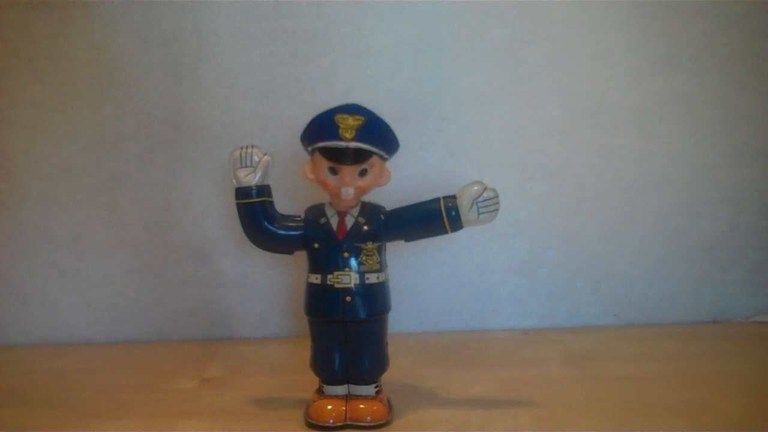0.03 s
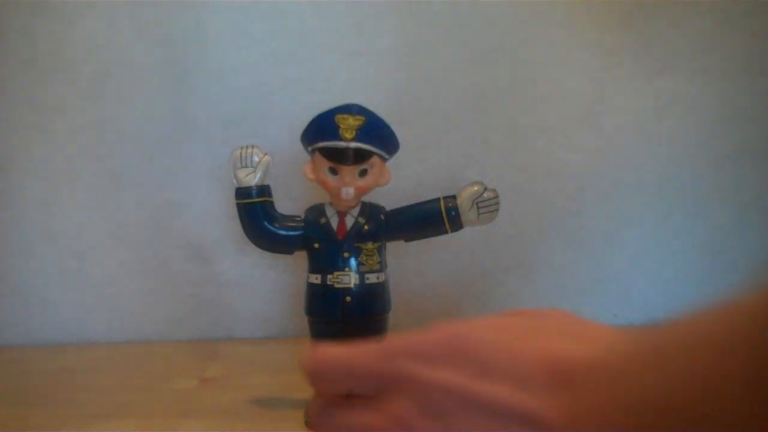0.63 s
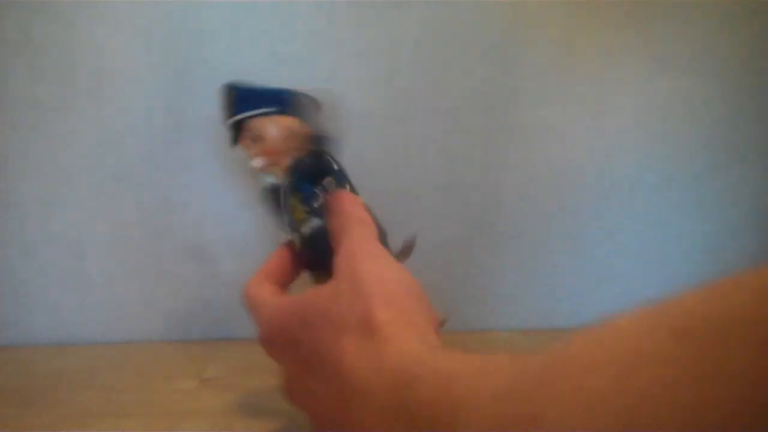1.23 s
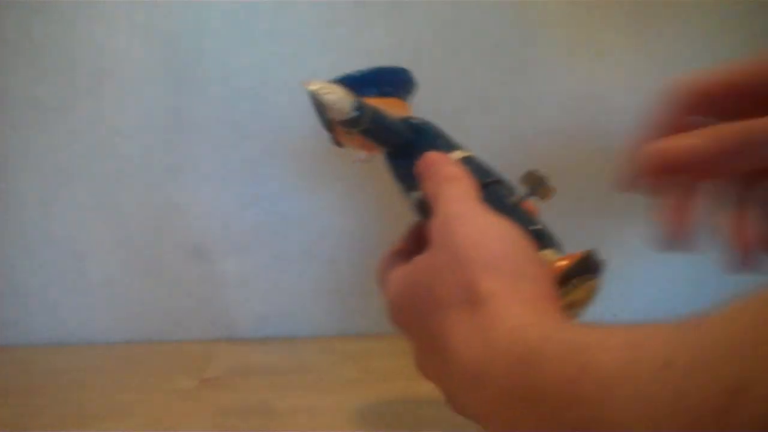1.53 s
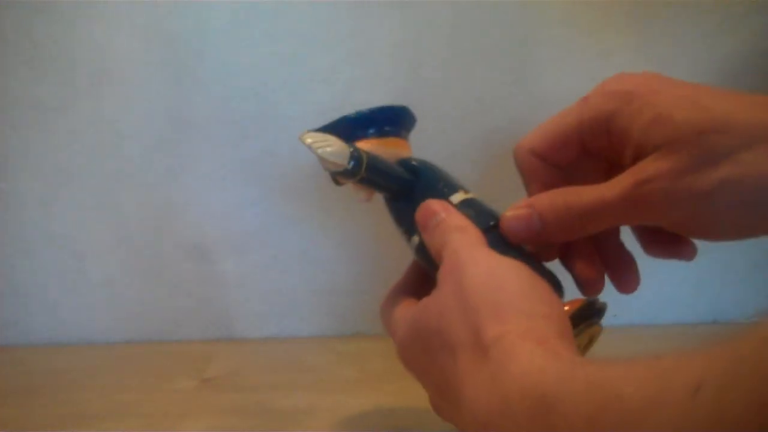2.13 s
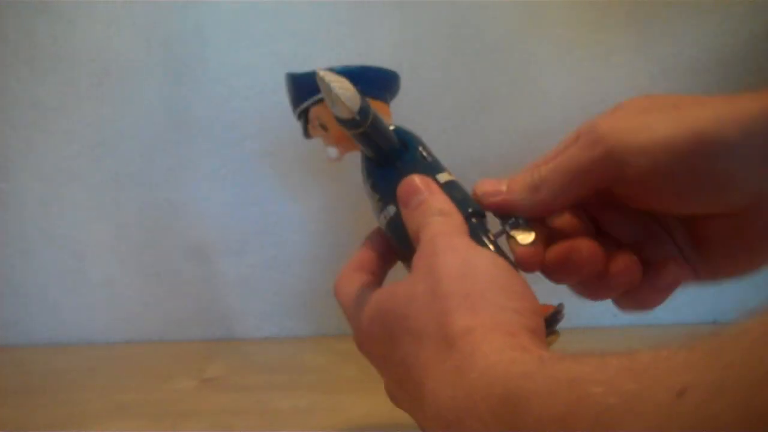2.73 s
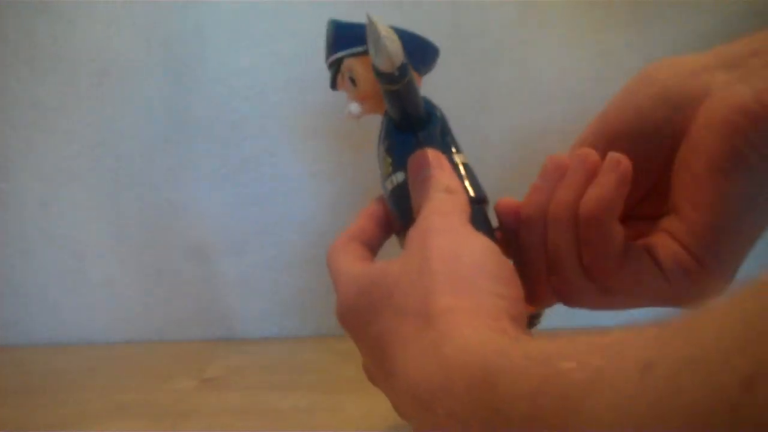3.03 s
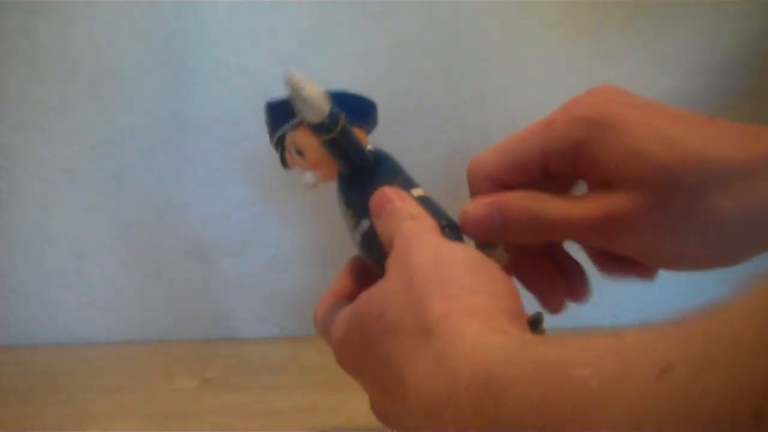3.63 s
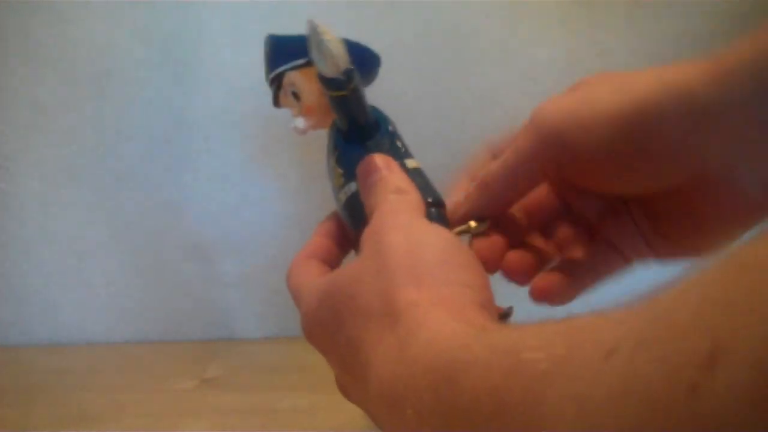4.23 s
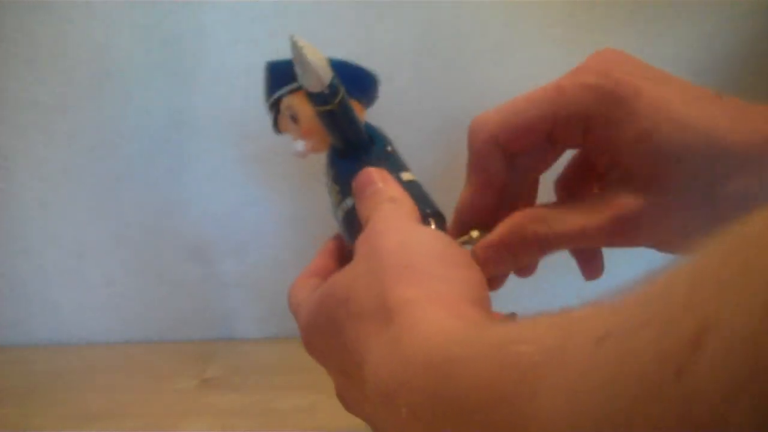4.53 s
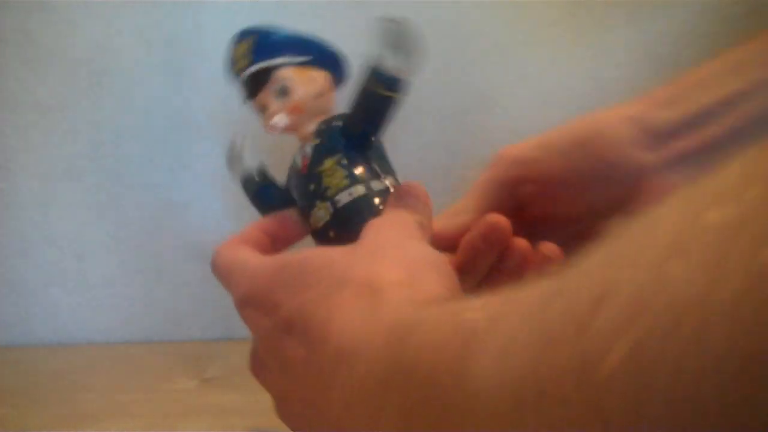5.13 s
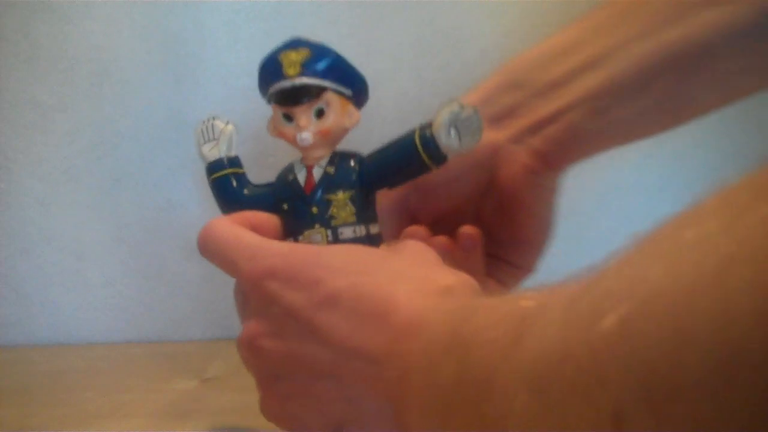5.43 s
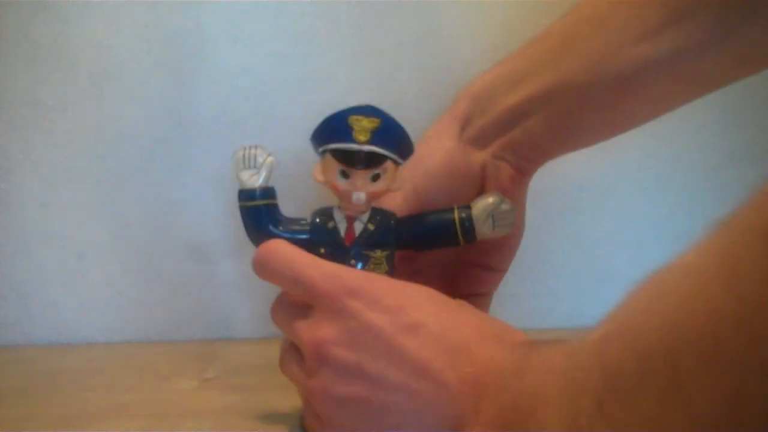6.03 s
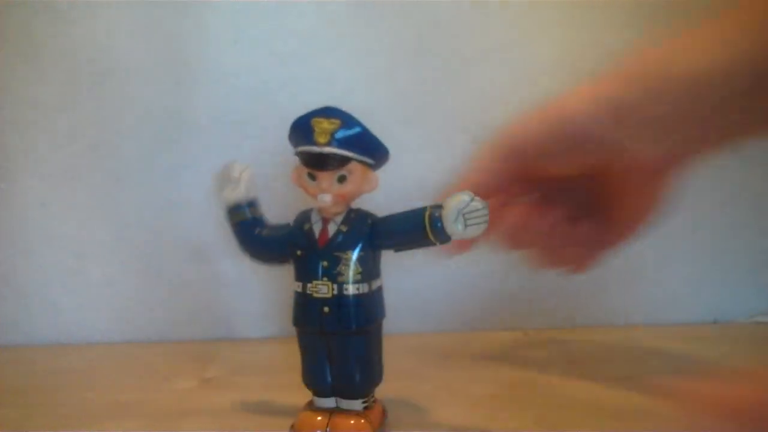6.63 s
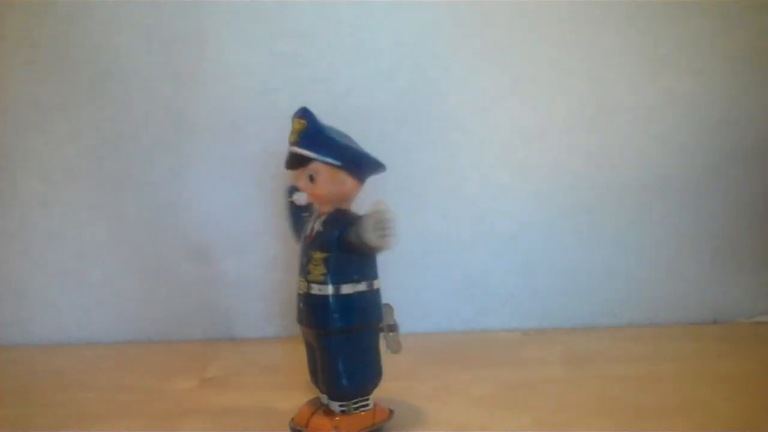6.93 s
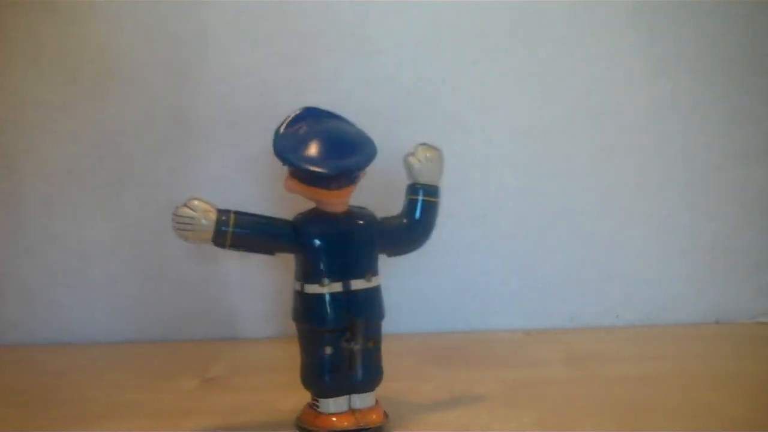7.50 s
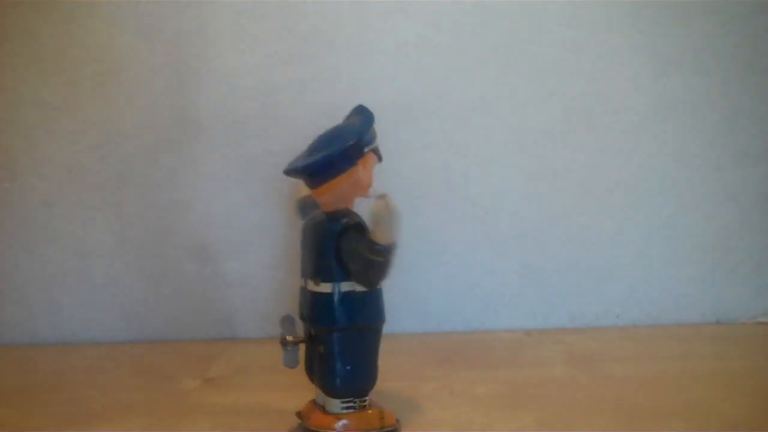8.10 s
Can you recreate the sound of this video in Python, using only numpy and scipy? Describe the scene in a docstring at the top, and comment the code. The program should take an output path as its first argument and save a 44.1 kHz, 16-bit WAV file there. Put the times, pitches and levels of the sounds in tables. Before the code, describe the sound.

Close by in a small quiet room, hands lift a tin clockwork figure with a faint hiss and light metallic taps. Winding follows: crisp snaps of the ratchet mixed with brief spurts of whirring gears. Hollow clonks and low bumps mark it being stood on a wooden table, where the motor runs continuously with a tinny rattle and buzz. The base squeaks briefly as it slips, and a sharp knock comes at the end.

```python
"""First come a soft handling rustle and a dull thump, then small taps as a tin clockwork toy is picked
up close by in a small quiet room. While it is wound, a catch (the pawl) snaps over a toothed wheel and
the gears whir in short runs. Set down with a knock, the toy rattles and buzzes against a wooden table,
and its base squeaks as it slips and turns."""
import sys
import numpy as np
from scipy import signal
from scipy.fft import rfft, irfft
from scipy.io import wavfile
from scipy.ndimage import uniform_filter1d, minimum_filter1d

SR = 44100
rng = np.random.default_rng(int(sys.argv[2]) if len(sys.argv) > 2 else 0)


def digitize_waveform(pressure):
    """Quantize a signal to 16-bit integers and store it at the path in sys.argv[1].

    Rows of a 2-D input are taken as channels; values are limited to [-1, 1].
    """
    field = np.atleast_2d(pressure).T
    bounded = np.clip(field, -1, 1)
    quanta = np.round(bounded * 32767).astype(np.int16)
    wavfile.write(sys.argv[1], SR, quanta)


N = 368676
FILTER_SIZE = 4096
TIME = np.arange(N) / SR
HZ = np.maximum(np.arange(FILTER_SIZE // 2 + 1) * SR / FILTER_SIZE, 1)

# Levels in the tables are relative. A "colour" says how strong the low and high pitches are.
# A fade_s is the time a ring takes to fall by 60 dB. Likeness runs from 0 (unrelated) to 1 (the same).
# colour of the room's air: pitch_hz, level_db
AIR_COLOUR = [(15, -54), (25, -17), (79, -14.5), (118, -1), (257, -9), (326, -9.5), (450, -4), (637, -8.5),
              (1120, -6), (1760, -13.5), (2130, -14), (2370, -15), (9770, -22.5), (12100, -29),
              (15000, -37)]
# how alike the soft background noises are in the two ears: pitch_hz, likeness
AIR_LIKENESS = [(50, .05), (110, 0.8), (500, 0.62), (1500, 0.41), (5000, 0.28), (12000, 0.13)]
# colour of the handling rustle: pitch_hz, level_db
RUSTLE_COLOUR = [(88, -33), (200, -2), (380, 2), (800, -11), (1200, -7), (2400, -20), (8000, -10.5),
                 (12000, -29), (15600, -62)]
# dull low bumps, one handling thump at the start, then bumps on the wooden table: start_s, level_db
BUMPS = [(0.083, -30.5), (6.004, -31), (6.106, -27), (6.546, -23.5), (6.639, -25), (6.74, -23),
         (6.774, -19.5), (6.828, -21.5), (8.333, -15)]
# colour of those bumps: pitch_hz, level_db
BUMP_COLOUR = [(40, -28), (90, -10), (165, 1), (260, -5.5), (450, -5), (900, -10.5), (3000, -24.5),
               (12000, -66)]
# how alike knocks, rings and their echo are in the two ears: pitch_hz, likeness
RING_LIKENESS = [(200, .965), (500, .96), (2000, .94), (5000, .82), (8000, .76), (12000, .4)]
# fingers, key and base knocking on the tin: start_s, treble_db, body_db
TAPS = [(0.2131, -34, -39.5), (0.528, -49, -38.5), (1.2406, -48, -33), (1.2496, -19.5, -38),
        (1.559, -40, -50.5), (1.7869, -30, -35), (2.0363, -41, -50), (2.0911, -32.5, -55),
        (2.166, -28, -45), (2.1947, -26, -41), (2.3778, -33.5, -55), (2.569, -26, -49), (2.6, -25, -48),
        (2.6348, -22, -45), (2.915, -30, -32), (2.9742, -8, -36), (3.103, -20, -30.5), (3.238, -12, -37),
        (3.3253, -22.5, -46), (4.2309, -5.5, -35.5), (4.2752, -10, -27), (4.4977, -6, -39),
        (4.8527, -27, -47), (4.8676, -13.5, -39.5), (5.7495, -14, -32), (5.79, -30, -40),
        (5.8493, -27, -36.5), (5.9562, -7.5, -23), (5.9966, -5, -21), (6.778, 0, -25), (8.332, 6.5, -27)]
# pitches at which the tin shell likes to ring: pitch_hz, width_hz, boost_db
SHELL_RINGS = [(856, 50, 13), (1328, 194, 9), (1617, 31, 8), (1835, 170, 4.5), (2880, 280, 5.5),
               (3410, 390, 2.5), (3764, 95, 5.5), (4750, 200, 2.5), (5840, 340, -4), (6050, 600, 2.5),
               (6950, 580, 3), (8120, 1100, 3), (10030, 320, 5)]
# a soft hiss while the toy is grasped and lifted: time_s, level_db
HISS_LEVELS = [(.75, -52), (.78, -40), (.95, -44.5), (1.2, -50), (1.32, -47.5), (1.44, -44), (1.46, -69)]
# colour of that hiss: pitch_hz, level_db
HISS_COLOUR = [(500, -11), (1260, -8.5), (3400, -6), (6000, -2.5), (7800, 4.5), (9000, -4.5), (10500, -9.5),
               (12000, -16), (14000, -17)]
# hollow clonks, once in the hand, then heel and toe on the wood: start_s, pitch_hz, fade_s, level_db
CLONKS = [(1.789, 1414, 0.069, -37.5), (5.958, 2850, 0.034, -18), (5.999, 1595, 0.052, -16.5)]
# the motor's speed, before the cam and small wobbles vary it: time_s, beats_per_s
MOTOR_SPEED = [(6.2, 183), (6.3, 198), (6.44, 187), (6.62, 175), (6.8, 208), (7.12, 211), (7.78, 181),
               (8.09, 158), (8.36, 188)]
# short runs of the gears while the toy is wound: start_s, peak_s, stop_s, level_db, sag_db_per_s
GEAR_RUNS = [(2.35, 2.68, 2.7, -42, 20), (2.67, 2.786, 3.49, -29, 23.5), (3.347, 3.55, 3.74, -26.5, 12),
             (3.846, 4.072, 4.28, -31, 39), (4.296, 4.495, 4.72, -20, 20), (4.853, 5.072, 5.74, -24.5, 17)]
# colour of the gears inside the hand: pitch_hz, level_db
HELD_COLOUR = [(100, -55), (400, -38), (800, -27.5), (1200, -22), (1700, -15), (2400, -14.5), (3500, -9),
               (5500, -3.5), (6500, -1), (7400, 2), (8500, -5.5), (10000, -17.5), (11500, -22.5),
               (14000, -27)]
# wheels and spring sing at their own pitches: pitch_hz, fade_s, level_db
WHEEL_RINGS = [(2850, 0.051, -20), (4850, 0.091, -28), (5950, 0.024, -21), (6930, 0.035, -17.5),
               (7430, 0.044, -16.5), (7550, 0.05, -18), (8540, 0.045, -16)]
# snaps of the pawl: start_s, level_db, pitch_hz, ring_db
PAWL_SNAPS = [(2.8323, -1.5, 4510, -15), (2.994, 0.5, 4640, -11.5), (3.1026, -2.5, 4680, -11.5),
              (3.8369, -1, 4530, -14), (3.946, 1, 4870, -22), (4.0502, 2, 4570, -16),
              (4.134, 1, 4750, -19.5), (4.9315, -6, 4560, -5), (5.1248, -6, 4590, -7),
              (5.2965, 1, 4560, -19.5), (5.483, -1, 4540, -14.5)]
# colour of the crack in each snap: pitch_hz, level_db
CRACK_COLOUR = [(200, -15), (800, -18), (2200, -12), (4300, 0.5), (5500, -3.5), (7000, 5.5), (8600, 3.5),
                (10500, -17), (14000, -20)]
# tones of the ratchet and its frame: multiple_of_snap_pitch, level_db, fade_s
FRAME_RINGS = [(0.174, -21.5, 0.042), (0.352, -33, 0.014), (.76, -16, 0.021), (0.911, -9, 0.019),
               (1.002, 6, 0.02), (1.07, -8, 0.017), (1.5, -0.5, 0.01), (1.83, -12, 0.023)]
# colour of the gears when the toy stands free: pitch_hz, level_db
GEAR_COLOUR = [(100, -49), (800, -24.5), (2400, -15.5), (4000, -14.5), (5500, -11.5), (6500, -6.5),
               (7400, -2.5), (8500, -5.5), (10000, -19.5), (11500, -24), (14000, -29.5)]
# colour of the shell rattling on wood: pitch_hz, level_db
RATTLE_COLOUR = [(60, -46), (130, -2.5), (300, -3.5), (700, -6.5), (1500, 7.5), (2400, -3.5), (3500, -5.5),
                 (4500, -7), (8000, -26)]
# pitches at which the shell rings when it stands on wood: pitch_hz, width_hz, boost_db
RATTLE_RINGS = [(403, 47, 19), (619, 87, 23.5), (867, 210, 13.5), (1076, 15, 15), (1527, 98, 9),
                (1798, 224, 21), (2033, 110, 12), (2850, 180, 17)]
# squeaks of the slipping base: start_s, length_s, start_hz, end_hz, level_db
SQUEAKS = [(6.768, 0.0067, 8130, 7100, -9), (6.788, 0.029, 6900, 6050, -11.5),
           (6.82, 0.024, 5550, 3760, -17.5), (6.827, 0.0125, 8530, 7640, -9), (8.324, .009, 7130, 7050, -8),
           (8.343, 0.014, 7000, 6170, -15)]
# how much louder the left side is than the right: pitch_hz, level_db
LEFT_OVER_RIGHT = [(200, -.7), (900, -1.2), (3000, -.3), (6700, 0), (7400, 3.5), (8200, 9.5), (10000, 7.5),
                   (11000, 10), (13000, 14)]


def from_db(db):
    """Turn decibels into a number to multiply a sound by."""
    return 10 ** (np.asarray(db) / 20)


def unit_power(x):
    """Scale a signal so that its average power is 1."""
    return x / np.sqrt(np.mean(x ** 2) + 1e-20)


def at_hz(points):
    """Join a table's points into a curve over all pitches, giving each octave equal room."""
    hz, value = np.transpose(points)
    return np.interp(np.log(HZ), np.log(hz), value)


def response(colour, rings=()):
    """Gain at each pitch: a broad colour with a hump or dip per ring, scaled to unit power."""
    humps_db = sum(db / (1 + (2 * (HZ - hz) / width) ** 2) for hz, width, db in rings)
    return unit_power(from_db(at_hz(colour) + humps_db))


def filtered(x, gain):
    """Give each pitch its gain, with no sound arriving early (a minimum-phase filter)."""
    cepstrum = irfft(np.log(gain + 1e-9))
    cepstrum[1:FILTER_SIZE // 2] *= 2
    cepstrum[FILTER_SIZE // 2 + 1:] = 0
    impulse = irfft(np.exp(rfft(cepstrum)))[:FILTER_SIZE // 2]
    return signal.oaconvolve(np.atleast_2d(x), impulse[None], axes=1)[:, :x.shape[-1]]


def drift(per_s):
    """A random wander of about 1 either way, heading for a new value per_s times a second."""
    targets = rng.standard_normal(N // 10)
    return unit_power(np.interp(TIME * per_s, np.arange(len(targets)), targets))


def ramp(start_s, takes_s):
    """Rise from 0 to 1 and stay there."""
    return np.clip((TIME - start_s) / takes_s, 0, 1)


def dying(fade_s, size=8192):
    """A level that falls by 60 dB in fade_s."""
    return np.exp(-np.log(1000) * TIME[:size] / fade_s)


def stereo_noise(size, likeness=RING_LIKENESS):
    """White noise, as alike in the two ears as the likeness table says."""
    alike = np.clip(at_hz(likeness), 0, .999)
    mid, side = rng.standard_normal((2, size))
    return filtered(mid, np.sqrt((1 + alike) / 2)) + filtered(side, np.sqrt((1 - alike) / 2)) * [[1], [-1]]


def burst(fade_s, size=8192):
    """Fading noise: countless close tones ringing after one blow."""
    return stereo_noise(size) * dying(fade_s, size)


def blow(fade_s, rise_s, rattle_db):
    """A loose contact rattles for a moment: a quick swell, then a ragged fade."""
    t = TIME[:8192]
    ragged = np.interp(t * 900, np.arange(200), rng.standard_normal(200))
    swell = 1 - np.exp(-t / rise_s)
    return burst(fade_s) * swell * from_db(rattle_db * np.clip(ragged, -2, 2))


def ringing(strikes, hz, fade_s):
    """One pitch kept ringing by a stream of strikes, scaled to unit power."""
    decay = from_db(-60 / (fade_s * SR))
    feedback = [1, -2 * decay * np.cos(2 * np.pi * hz / SR), decay * decay]
    return unit_power(signal.lfilter([1, 0, -1], feedback, strikes + 1e-18))


def add(out, start_s, sound):
    """Mix a sound in at the given time."""
    start = round(start_s * SR)
    out[:, start:start + sound.shape[1]] += sound[:, :N - start]


def room_air(level_db=-56.5, whine_hz=11806, whine_db=-80):
    """The quiet room: steady air noise and a thin electric whine."""
    air = from_db(level_db) * filtered(stereo_noise(N, AIR_LIKENESS), response(AIR_COLOUR))
    return air + from_db(whine_db) * np.sin(2 * np.pi * whine_hz * TIME)


def handling_rustle(peak_s=0.017, level_db=-49, fade_db_per_s=36):
    """A brief rustle of handling dies away at the start."""
    level = from_db(level_db - fade_db_per_s * np.abs(TIME - peak_s))
    return level * filtered(stereo_noise(N, AIR_LIKENESS), response(RUSTLE_COLOUR))


def dull_bumps(gain_db=-8, fade_s=0.2):
    """Short, low booms: one handling thump at the start, then bumps on the wooden table."""
    out = np.zeros((2, N))
    for start_s, db in BUMPS:
        add(out, start_s, from_db(db + gain_db) * filtered(burst(fade_s), response(BUMP_COLOUR)))
    return out


def shell_taps():
    """Blows on the tin shell; heavier ones bring out its low rings."""
    out = np.zeros((2, N))
    shell = response([(100, 0), (15000, 0)], SHELL_RINGS)
    for start_s, treble_db, body_db in TAPS:
        colour = [(150, body_db - 12), (800, body_db + 7), (1600, body_db + 7),
                  (3400, (body_db + treble_db) / 2 + 2), (7500, treble_db + 2), (12000, treble_db - 22)]
        tap = blow(fade_s=0.038, rise_s=0.0018, rattle_db=3)
        add(out, start_s, from_db(1.5) * filtered(tap, shell * from_db(at_hz(colour))))
    return out


def lifting_hiss():
    """A soft hiss comes and goes as the toy is grasped and lifted."""
    level = from_db(np.interp(TIME, *np.transpose(HISS_LEVELS), left=-np.inf, right=-np.inf))
    return level * filtered(stereo_noise(N, AIR_LIKENESS), response(HISS_COLOUR))


def hollow_clonks():
    """Each hollow part clonks with a pair of close tones."""
    out, t = np.zeros((2, N)), TIME[:8192]
    for start_s, hz, fade_s, db in CLONKS:
        pair = np.sin(2 * np.pi * hz * t) + 0.39 * np.sin(2 * np.pi * 0.85 * hz * t)
        add(out, start_s, (from_db(db) * pair * dying(fade_s))[None])
    return out


def motor_speed(cam_per_s=4.88, slowest_s=7.485, swing=0.025):
    """Beats per second: the motor slows each time the cam (an off-centre wheel) lifts the toy's arms."""
    load = np.cos(2 * np.pi * cam_per_s * (TIME - slowest_s))
    return np.interp(TIME, *np.transpose(MOTOR_SPEED)) * (1 - swing * load)


def gear_runs(catch_s=0.048, swell_db_per_s=68, brake_db_per_s=466):
    """Strength of the gears in the hand: each run catches, swells, sags and is braked by the fingers."""
    strength = np.zeros(N)
    for start_s, peak_s, stop_s, db, sag_db_per_s in GEAR_RUNS:
        below_peak_db = (swell_db_per_s * np.maximum(peak_s - TIME, 0)
                         + sag_db_per_s * np.maximum(TIME - peak_s, 0)
                         + brake_db_per_s * np.maximum(TIME - stop_s, 0))
        strength += ramp(start_s, catch_s) * from_db(db - below_peak_db)
    return strength


def motor_strikes(beat_count, teeth_per_s, teeth_db, uneven_db, surge_db):
    """One uneven blow per beat of the motor, with gear teeth chattering in between."""
    beats = np.diff(np.floor(beat_count), prepend=0)
    teeth = (rng.random(N) < teeth_per_s / SR) * rng.choice([-1, 1], N)
    strength_db = uneven_db * np.clip(rng.standard_normal(N), -2, 2) + surge_db * drift(70)
    return (beats + from_db(teeth_db) * teeth) * from_db(strength_db)


def tin_chatter(strikes, fade_s, spots=12, shifts_per_s=14):
    """Strikes land on spots of the tin, each with its own dense ring; the spots shift as wheels turn."""
    spot = np.floor(TIME * shifts_per_s + rng.uniform(0, 4, N)) % spots
    out = np.zeros((2, N))
    for k in range(spots):
        hits = strikes * (spot == k)
        out += signal.oaconvolve(hits[None], burst(fade_s, size=2048), axes=1)[:, :N]
    return unit_power(out)


def singing_wheels(strikes, swell_db=5):
    """Each wheel's ring swells and fades as its teeth mesh more or less tightly."""
    out = np.zeros((2, N))
    for hz, fade_s, db in WHEEL_RINGS:
        tightness = from_db(swell_db * np.clip(drift(22), -2, 2))
        out += from_db(db) * ringing(strikes * tightness, hz, fade_s)
    return out


def motor_in_hand(beat_count, loosen_s=5.33):
    """While the toy is wound, the gears whir in short runs, muffled by the hand."""
    strikes = motor_strikes(beat_count, teeth_per_s=1400, teeth_db=0.5, uneven_db=3.5, surge_db=1.75)
    chatter = tin_chatter(strikes, fade_s=0.018)
    gears = from_db(-0.25) * filtered(chatter, response(HELD_COLOUR, SHELL_RINGS))
    wheels = from_db(-8) * singing_wheels(chatter)
    # the fingers loosen, and the shell rings more freely
    shell = from_db(-12.5) * ramp(loosen_s, takes_s=0.15) * ringing(chatter, hz=2850, fade_s=0.027)
    return gear_runs() * (gears + wheels + shell)


def key_knocks(per_s=35, knock_db=-62, rasp_db=-54):
    """Under the fingers the key rocks in its socket: soft knocks and a fine rasp in the hollow body."""
    runs = gear_runs()
    effort = (runs / runs.max()) ** 0.65
    knocks = (rng.random(N) < per_s / SR) * effort
    # every knock stirs the body's two low tones by a different amount
    body = sum(ringing(knocks * rng.uniform(-0.86, 1, N), hz, fade_s=0.024) for hz in [740, 890])
    rasp = ringing(rng.standard_normal(N), hz=860, fade_s=0.043)
    return from_db(knock_db) * body + from_db(rasp_db) * effort * rasp


def ratchet(crack_db=-9, ring_boost_db=4, bass_cut_hz=900):
    """The pawl drops off a tooth: a hard crack and a brief ring of the spring frame."""
    out, t = np.zeros((2, N)), TIME[:8192]
    for start_s, db, pitch_hz, ring_db in PAWL_SNAPS:
        crack = filtered(blow(fade_s=0.029, rise_s=0.000096, rattle_db=3.5), response(CRACK_COLOUR))
        ring = np.zeros_like(crack)
        for multiple, tone_db, fade_s in FRAME_RINGS:
            ear_levels = from_db(tone_db + 2 * rng.standard_normal((2, 1)))
            tone = np.sin(2 * np.pi * (multiple * pitch_hz * t + rng.random()))
            ring += ear_levels * dying(fade_s) * tone
        ring *= 1 - dying(0.0052)  # the frame takes a moment to swing up
        snap = from_db(crack_db) * crack + from_db(ring_boost_db + ring_db) * ring
        add(out, start_s, from_db(db) * snap)
    # the snap carries no bass
    return signal.sosfilt(signal.butter(2, bass_cut_hz, "high", fs=SR, output="sos"), out)


def table_strengths(start_s=6.013, let_go_s=6.637, dip_s=6.895, usual_beats_per_s=204.4):
    """Strength of whir, rattle and buzz: a faster motor hits harder; the hand damps shell and base."""
    octaves = np.log2(motor_speed() / usual_beats_per_s)  # doublings of speed
    grip = 1 - ramp(let_go_s, takes_s=0.22)
    spin_up = ramp(start_s, takes_s=0.23)
    dip_db = -4 * np.exp(-((TIME - dip_s) / 0.051) ** 2)  # the level dips briefly just after the squeaks
    drive = spin_up * from_db(dip_db)
    return (drive * np.sqrt(spin_up) * from_db(-18 + 3 * octaves),
            drive * from_db(-28.5 + 9.5 * octaves - 6 * grip),
            drive * from_db(-29 + 16 * octaves - 13.5 * grip))


def motor_on_table(beat_count):
    """With the toy standing, the gears whir, the shell rattles and the base shakes the table."""
    whir_level, rattle_level, buzz_level = table_strengths()
    strikes = motor_strikes(beat_count, teeth_per_s=2000, teeth_db=4.5, uneven_db=2, surge_db=0.67)
    chatter = tin_chatter(strikes, fade_s=0.021)
    gears = from_db(-0.37) * filtered(chatter, response(GEAR_COLOUR, SHELL_RINGS))
    whir = gears + from_db(-1.5) * singing_wheels(chatter)
    blows = motor_strikes(beat_count, teeth_per_s=700, teeth_db=-7, uneven_db=1, surge_db=1)
    rattle = from_db(2) * filtered(tin_chatter(blows, fade_s=0.011), response(RATTLE_COLOUR, RATTLE_RINGS))
    # the table hums at the beat rate; the overtones grow when the shell presses hard
    hum = from_db(1.5 * drift(40)) * np.sin(2 * np.pi * beat_count)
    overtones = sum(from_db(db + 4.2 * drift(150)) * np.sin(2 * np.pi * multiple * beat_count)
                    for multiple, db in [(2, -7), (3, -9)])
    buzz = hum + overtones * buzz_level / buzz_level.max()
    return whir_level * whir + rattle_level * rattle + buzz_level * buzz


def base_squeaks():
    """The metal base sticks and slips, in short falling chirps."""
    out = np.zeros((2, N))
    waver = 1 + .012 * drift(900)
    for start_s, length_s, start_hz, end_hz, db in SQUEAKS:
        progress = np.linspace(0, 1, int(length_s * SR))
        glide_hz = start_hz + (end_hz - start_hz) * progress
        hz = glide_hz * waver[int(start_s * SR):][:len(progress)]
        level = from_db(db) * np.sqrt(np.abs(np.sin(np.pi * progress)))
        add(out, start_s, (level * np.sin(2 * np.pi * np.cumsum(hz) / SR))[None])
    return out


def room_echo(x, fade_s=0.35, level_db=-13.5):
    """The small room gives each sound a short, smooth tail."""
    tail = burst(fade_s, size=SR // 2)
    tail /= np.sqrt(np.sum(tail ** 2) / 2)
    return from_db(level_db) * signal.oaconvolve(x, tail, axes=1)[:, :N]


def scene():
    """The toy, its room and the quiet behind it."""
    unsteady_speed = motor_speed() * (1 + .026 * drift(130))
    beat_count = np.cumsum(unsteady_speed) / SR
    direct = motor_in_hand(beat_count) + motor_on_table(beat_count) + ratchet() + key_knocks()
    direct += shell_taps() + hollow_clonks() + dull_bumps() + base_squeaks()
    return direct + room_echo(direct) + room_air() + lifting_hiss() + handling_rustle()


def record(dry, cutoff_hz=14200):
    """Make the left side brighter than the right, fade in, hold down the peaks and cut the top treble."""
    lean = from_db(at_hz(LEFT_OVER_RIGHT))
    stereo = np.vstack([filtered(dry[0], 2 * lean / (1 + lean)), filtered(dry[1], 2 / (1 + lean))])
    stereo[0] = np.append(0, stereo[0, :-1])  # the left side comes one sample later
    fade_in = np.interp(TIME, [.04, .055], [.01, 1])
    safe_gain = 1 / np.maximum(np.abs(stereo).max(axis=0), 1)
    smooth_gain = uniform_filter1d(minimum_filter1d(safe_gain, size=65), size=65)
    treble_cut = signal.ellip(12, .1, 80, cutoff_hz, fs=SR, output="sos")
    return signal.sosfilt(treble_cut, stereo * fade_in * smooth_gain)


dry = scene()
out = record(dry)
digitize_waveform(out)
```